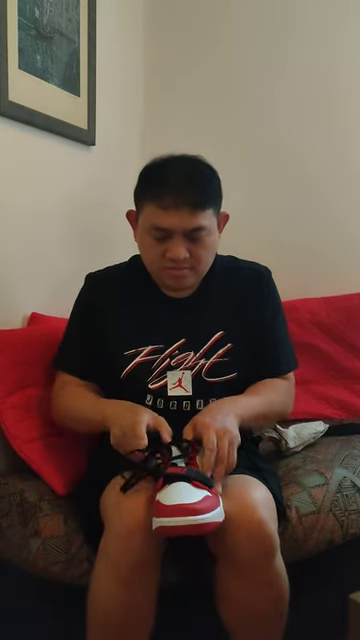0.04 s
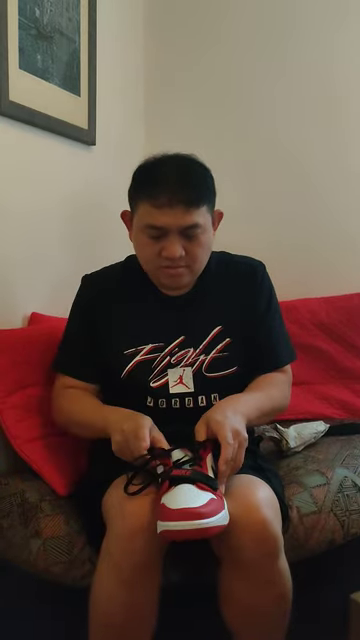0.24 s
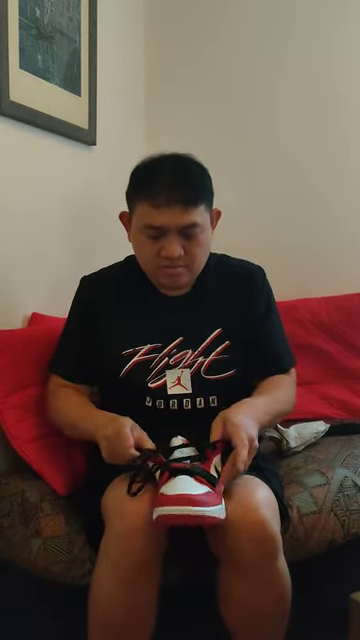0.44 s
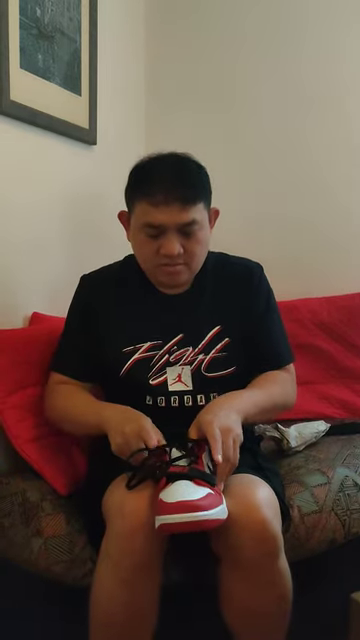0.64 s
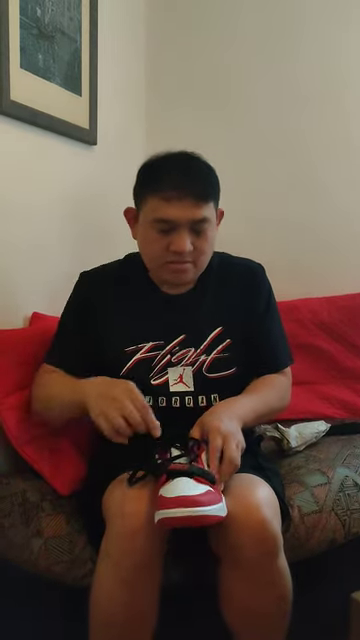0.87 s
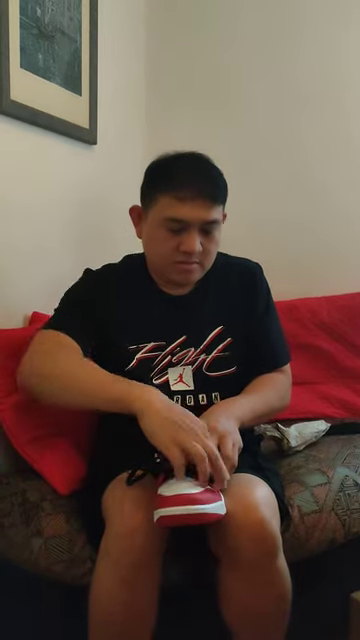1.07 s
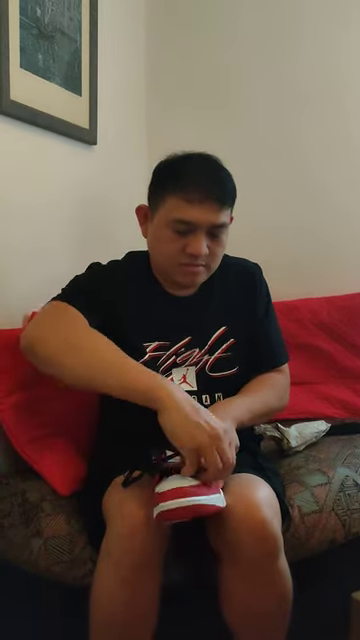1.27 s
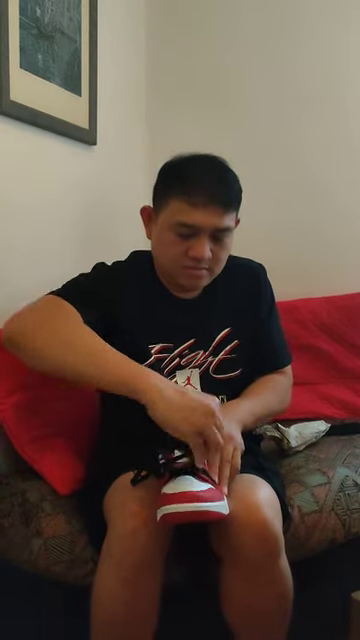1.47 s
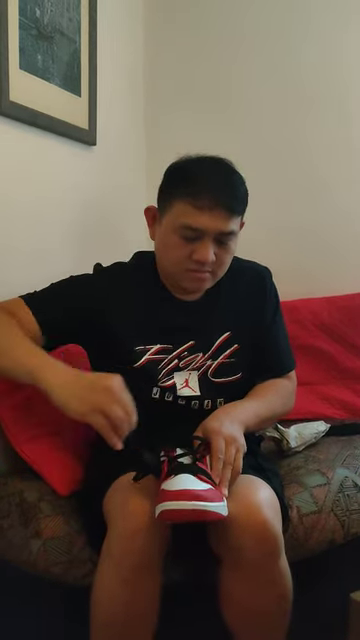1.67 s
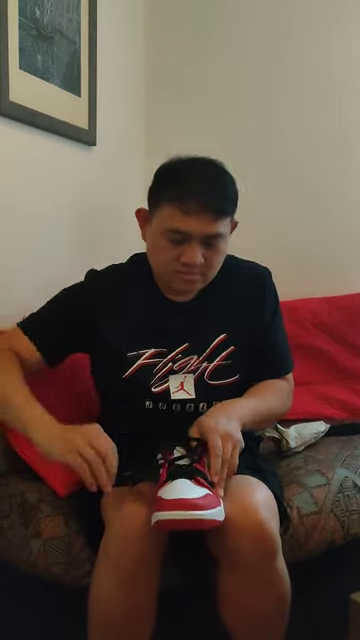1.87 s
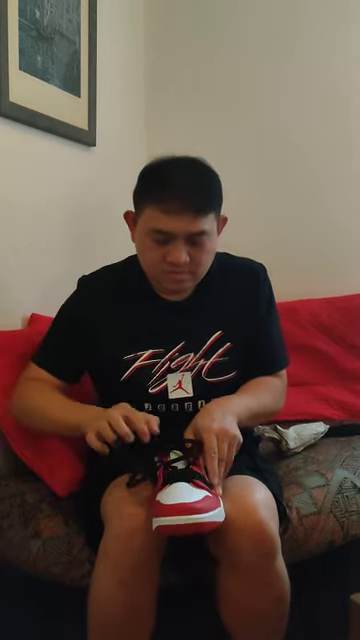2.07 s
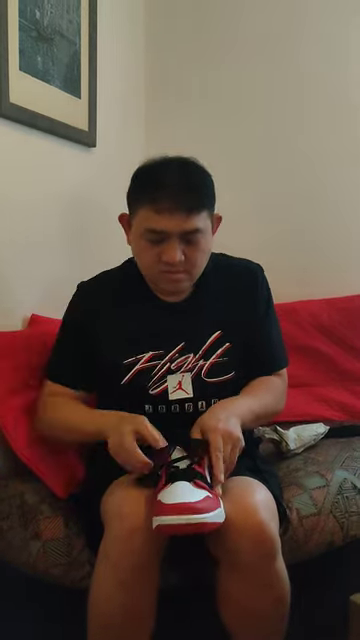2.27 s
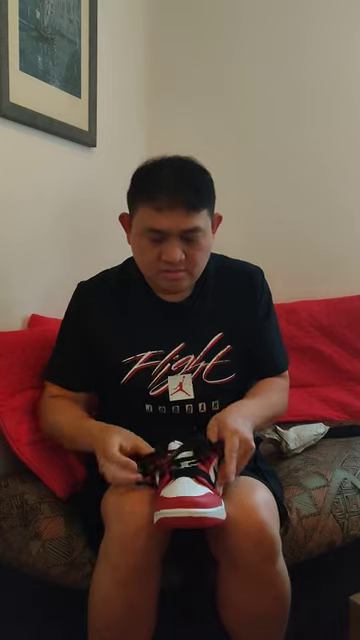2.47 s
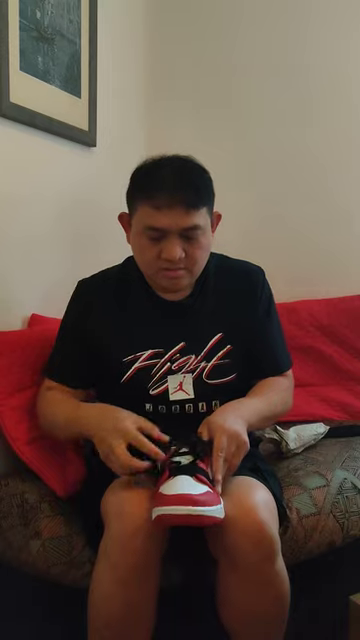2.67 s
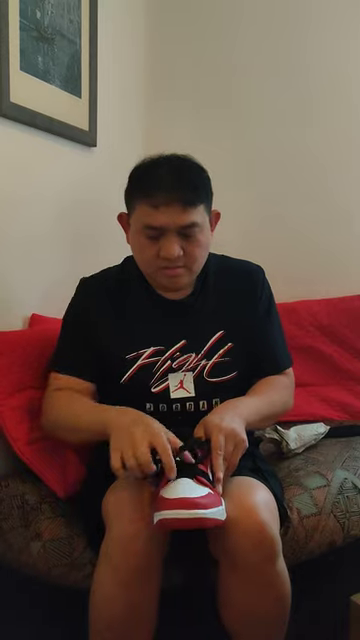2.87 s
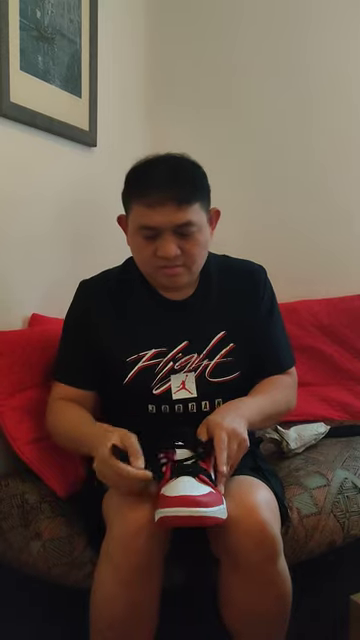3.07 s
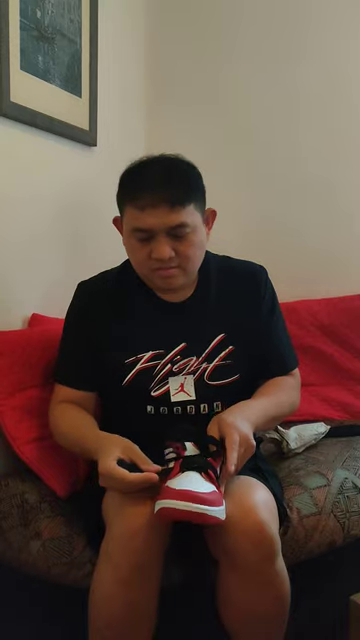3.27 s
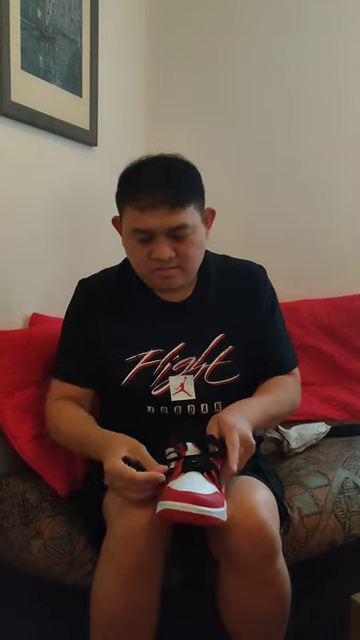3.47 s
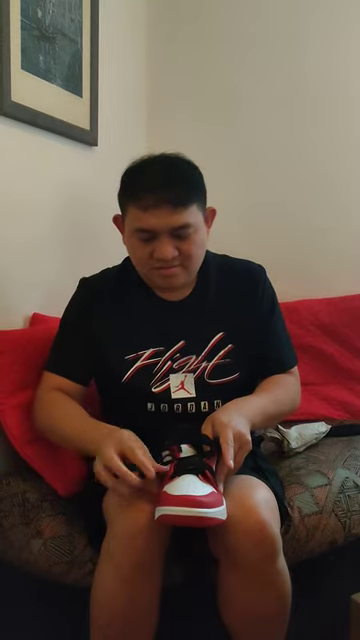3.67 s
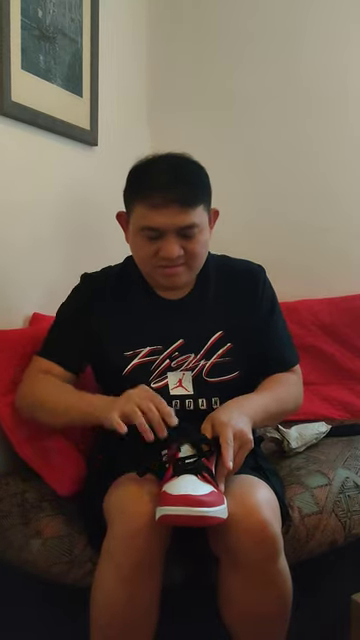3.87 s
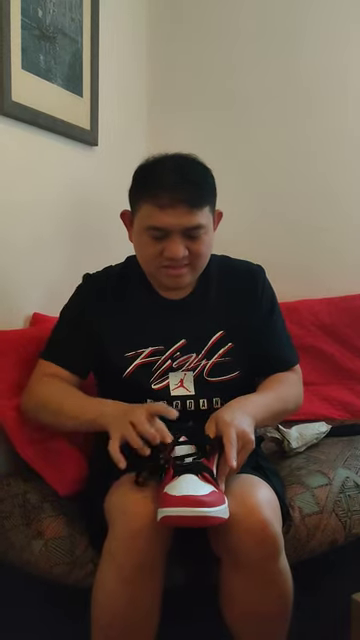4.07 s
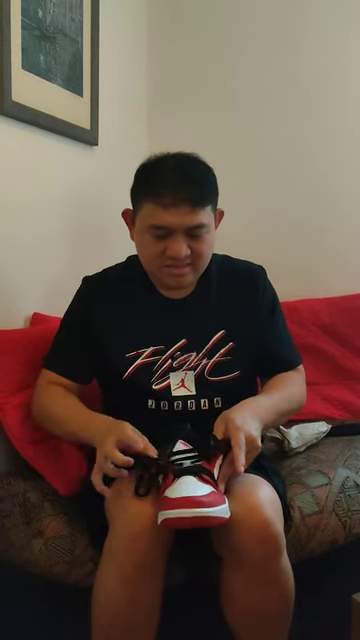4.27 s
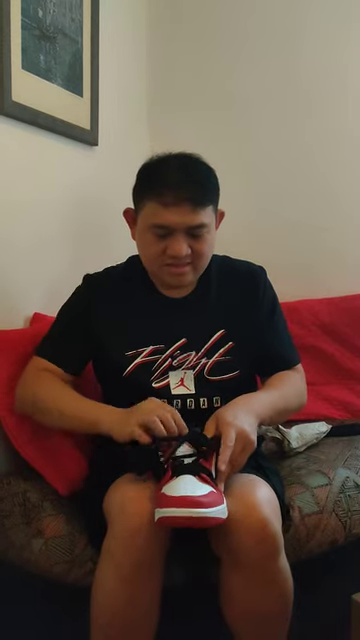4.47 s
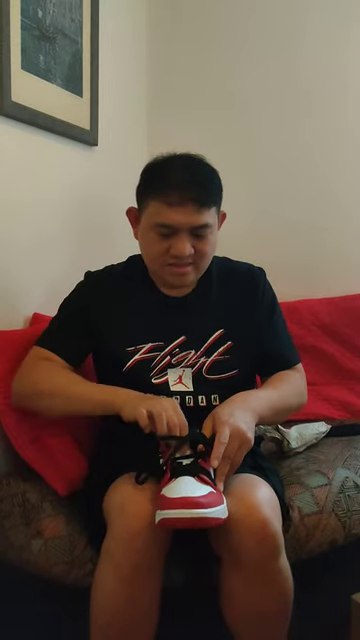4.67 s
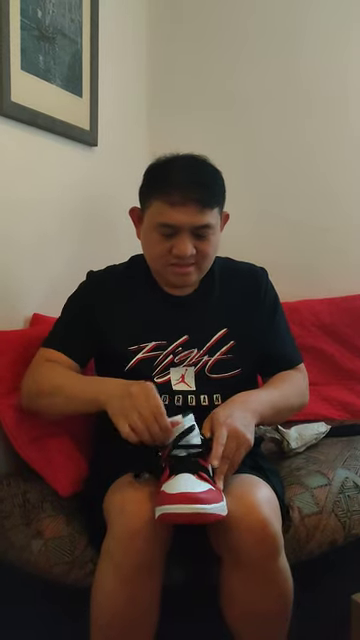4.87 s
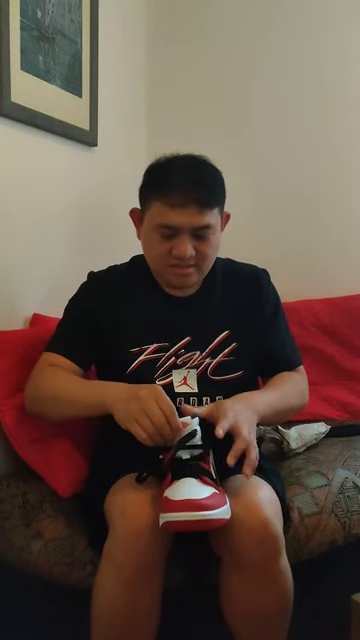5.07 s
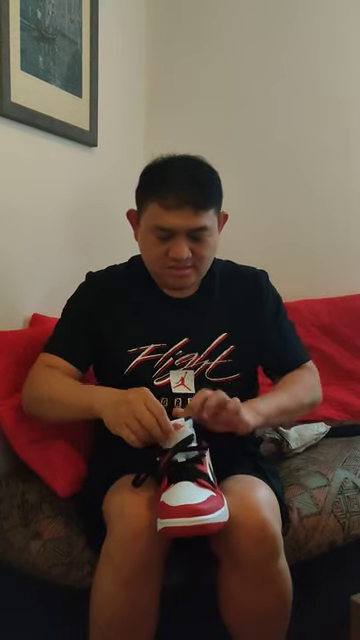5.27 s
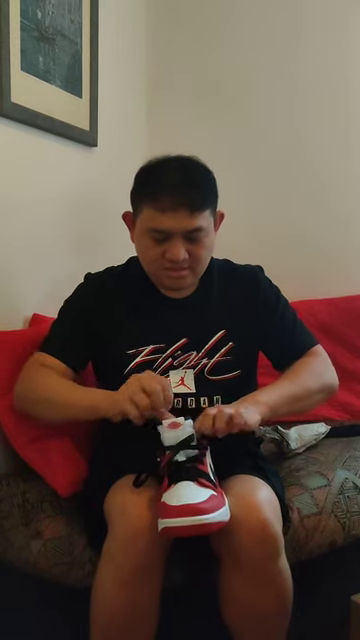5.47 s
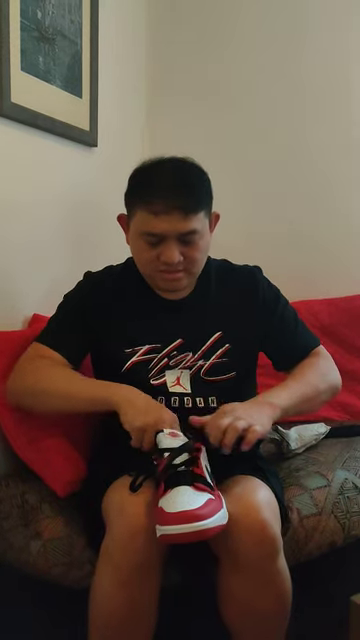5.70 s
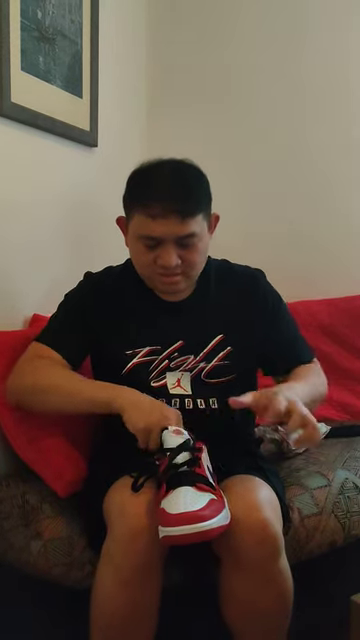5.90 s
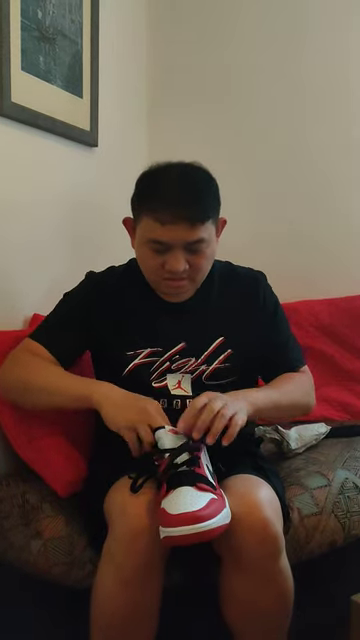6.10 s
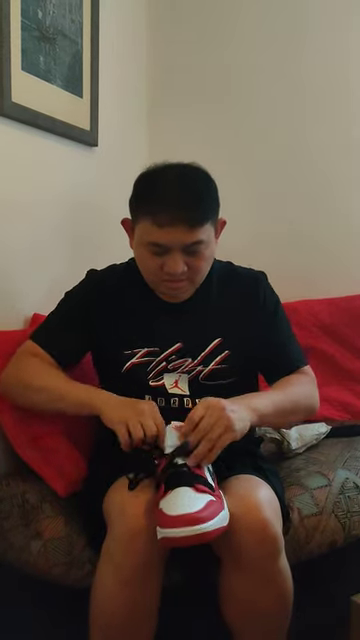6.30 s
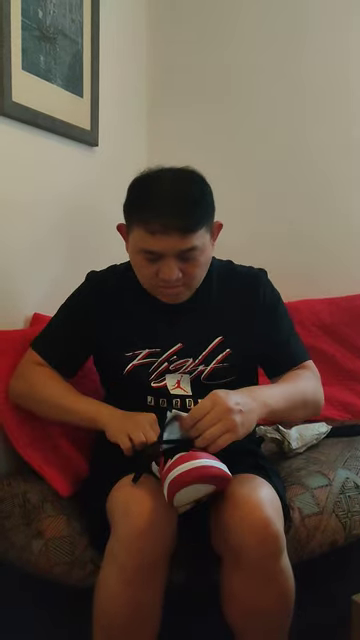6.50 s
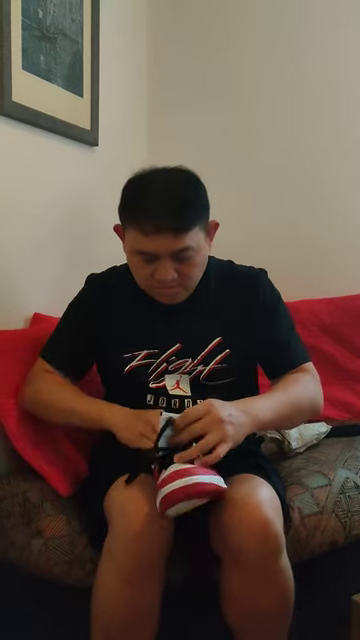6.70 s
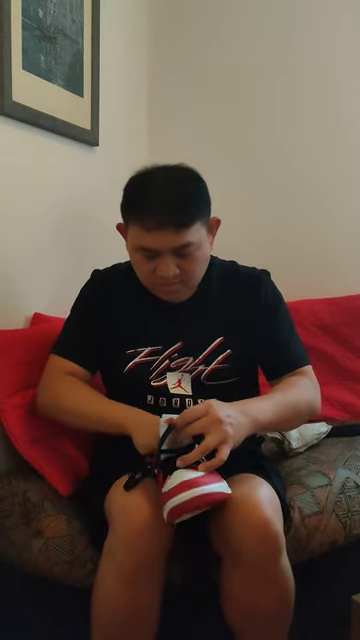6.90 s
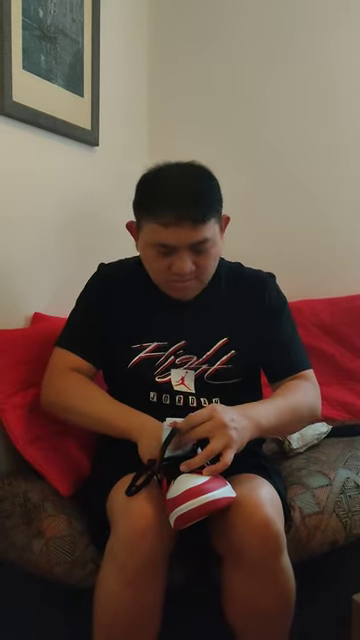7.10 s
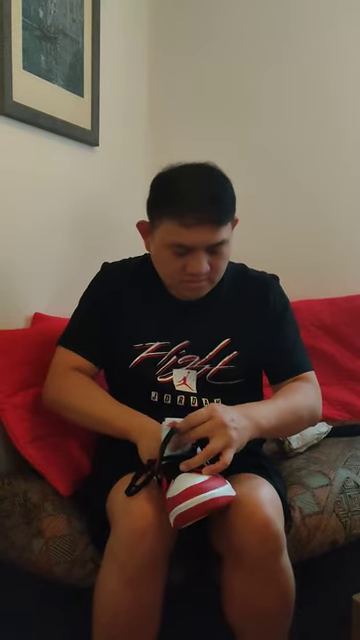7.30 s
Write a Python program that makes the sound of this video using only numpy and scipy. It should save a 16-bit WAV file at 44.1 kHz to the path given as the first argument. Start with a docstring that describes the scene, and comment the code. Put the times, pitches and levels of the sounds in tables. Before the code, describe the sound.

Soft lace rustling, one bright zipping swish, then small leather rubs, dry ticks and dull shoe bumps, ending with a brief scrape and thud.

```python
"""In a small, quiet room someone laces a leather sneaker on their lap.
The lace rustles and is pulled through an eyelet with a loud swish; fingers rub and tap the hollow shoe, which
thuds on the knees and scuffs as it is turned at the end. Rubbing is a dense train of random slips through a
colour; catches and ticks are decaying noise bursts; bumps, thuds and the scuff's ring are damped sines.
Decaying noise makes the brief answer of the walls, over faint air."""
import sys
import numpy as np
from scipy import signal
from scipy.fft import rfft, irfft, next_fast_len
from scipy.io import wavfile
from scipy.ndimage import uniform_filter1d, map_coordinates

SR = 44100
rng = np.random.default_rng(int(sys.argv[2]) if len(sys.argv) > 2 else 0)


def to_wav(sig):
    """Store sig (one row per channel, or 1-D mono) as 16-bit WAV at the path in sys.argv[1].

    Samples outside -1..1 are clipped; the rate is SR.
    """
    pcm = np.clip(np.atleast_2d(sig), -1, 1) * 32767
    pcm = np.round(pcm).astype(np.int16)
    wavfile.write(sys.argv[1], SR, pcm.T)  # frames by channels


N = 324085
TIME = np.arange(N) / SR
# Every spectrum below lists hz, relative density_db (per Hz); its overall level is normalised.
# Event levels are relative too: the layers that play them add their own trims and envelopes.


def amp(db):
    """The decibel law: level to linear gain."""
    return 10 ** (np.asarray(db) / 20)


def unit(x):
    """Power normalisation: scale to rms 1."""
    return x / np.sqrt(np.mean(x ** 2) + 1e-20)


def along(points, hz):
    """Logarithmic frequency scale: interpolate (hz, value) points along it."""
    point_hz, value = np.transpose(points)
    return np.interp(np.log(hz + 1), np.log(point_hz + 1), value)


def gains(rows):
    """Amplitude envelopes: one gain curve for each dB column, silent outside the rows' span."""
    s, *columns = np.transpose(rows)
    gate = np.interp(TIME, [s[0] - 0.02, s[0], s[-1], s[-1] + 0.02], [0, 1, 1, 0])
    return np.array([gate * amp(np.interp(TIME, s, column)) for column in columns])


def wobble(rate):
    """Slow random modulation: a smooth curve with rate knots a second."""
    knots = rng.standard_normal(int(N * rate / SR) + 4)
    return map_coordinates(knots, [TIME * rate])


def filtered(x, response):
    """Linear filtering: multiply the spectrum by a response of frequency."""
    size = next_fast_len(N + SR // 2)
    hz = np.fft.rfftfreq(size, 1 / SR)
    return irfft(rfft(x, size) * response(hz), size)[..., :N]


def coloured(x, spectrum):
    """Spectral shaping: a response that keeps the power of white noise."""
    return filtered(x, lambda hz: unit(amp(along(spectrum, hz))))


def add(track, s, sound):
    """Superposition: mix a sound into a track at time s."""
    start = max(round(s * SR), 0)
    track[start:start + len(sound)] += sound[:N - start]


def friction(spectrum, slips_per_s, spread_db, judder_db, judder_rate):
    """Stick-slip friction of rms 1: tiny slips of random size, modulated by an uneven grip."""
    slips = rng.random(N) < slips_per_s / SR
    spread = amp(spread_db * np.clip(rng.standard_normal(N), -2, 2))
    sizes = spread * rng.standard_normal(N)
    grip = amp(judder_db * np.clip(wobble(judder_rate), -2, 2))
    return unit(coloured(slips * sizes * grip, spectrum))


def patchy(x, patchy_db):
    """Time-varying filtering: the colour of a rub drifts as the contact moves; rms 1."""
    z = signal.stft(x, nperseg=512)[2]
    field = uniform_filter1d(rng.standard_normal(z.shape), 7, axis=0)  # smooth over frequency
    field = uniform_filter1d(field, 12, axis=1)  # and over time
    drifting = signal.istft(z * amp(patchy_db * unit(field)), nperseg=512)[1]
    return unit(drifting[:N])


def cracks(rows, spectrum, t60):
    """Sudden release: a coloured noise burst with exponential decay for each (start_s, level_db)."""
    track, t = np.zeros(N), np.arange(SR // 20) / SR
    for s, db in rows:
        add(track, s, amp(db - 60 * t / t60) * rng.standard_normal(len(t)))
    return coloured(track, spectrum)


# the long pull: time_s, lace_hiss_db, leather_drag_db
PULL_COURSE = [(1.28, -64, -74), (1.3, -49.5, -60), (1.335, -47.5, -58), (1.347, -33.5, -54.5),
               (1.375, -34.5, -51.5), (1.42, -40.5, -52), (1.449, -35, -46.5), (1.5, -37, -46.5),
               (1.544, -47.5, -48), (1.562, -31.5, -48), (1.602, -28, -47), (1.66, -56, -70.5)]
# spectrum of the braid sliding through the eyelet: hz, density_db
SLIDE_COLOUR = [(300, -61), (1760, -31), (3000, -22), (3700, -12), (4500, -1), (5900, -1.5), (7000, 4),
                (8050, -2), (8950, 5.5), (9800, -6), (11800, -8.5), (12600, -22), (14200, -22)]
# spectrum of the lace whipping out at the end of the pull: hz, density_db
WHIP_COLOUR = [(300, -65.5), (3000, -21.5), (4500, -18), (5600, -5), (6700, 2), (7900, 0.5), (9000, 4),
               (10000, -15), (11500, -7.5), (12800, -20), (14200, -26.5)]
# spectrum of the lace dragging on the leather: hz, density_db
DRAG_COLOUR = [(40, -51), (100, -15.5), (250, -4.5), (540, 3.5), (800, -6.5), (1500, -5), (1900, -7),
               (2300, 0), (2900, -4.5), (4600, 1.5), (6500, -5), (10000, -32.5)]
# spectrum of the hollow shoe shaken by rubbing, in the pull and in handling: hz, density_db
HOLLOW_COLOUR = [(35, -52), (90, -33), (190, -9), (270, -9), (345, 8), (410, -5.5), (560, -8), (800, -21),
                 (1500, -34), (5000, -58.5)]
WHIP_S, WHIP_TURN_S = 1.54, 0.03  # start and duration of the turn to the whip's hiss


def pull():
    """Stick-slip excitation: the braid rasps in the eyelet; its drag shakes leather and hollow."""
    hiss, drag = gains(PULL_COURSE)
    whip = np.clip((TIME - WHIP_S) / WHIP_TURN_S, 0, 1)
    slide = friction(SLIDE_COLOUR, slips_per_s=11000, spread_db=1.0, judder_db=6, judder_rate=300)
    flick = friction(WHIP_COLOUR, slips_per_s=12000, spread_db=1.5, judder_db=3.5, judder_rate=120)
    # equal-power crossfade from slide to flick
    rasp = hiss * (np.sqrt(1 - whip) * amp(-3) * slide + np.sqrt(whip) * amp(-2.5) * flick)
    rub = friction(DRAG_COLOUR, slips_per_s=7000, spread_db=3, judder_db=2.0, judder_rate=120)
    leather = amp(2.6) * drag * patchy(rub, patchy_db=1.9)
    shake = friction(HOLLOW_COLOUR, slips_per_s=1500, spread_db=5.0, judder_db=3.0, judder_rate=50)
    hollow = amp(-1) * drag * shake
    return rasp + leather + hollow


def during_pull(per_s):
    """Jittered periodicity: unevenly spaced moments of the pull, with hiss and drag (dB) at each."""
    s, hiss_db, drag_db = np.transpose(PULL_COURSE)
    turns = np.arange(100) + rng.uniform(-0.5, 0.5, 100)
    times = s[0] + turns / per_s
    times = times[times < s[-1]]
    return times, np.interp(times, s, hiss_db), np.interp(times, s, drag_db)


# the weave catches on an eyelet in the pull, then two lace ticks near 6.57 s: start_s, level_db
LACE_SNAPS = [(1.2526, -51), (1.2862, -38.5), (1.2939, -35), (1.2984, -34), (1.3124, -27), (1.325, -23.5),
              (1.343, -22), (1.3618, -18.5), (1.3948, -25), (1.4434, -23), (1.4571, -25), (1.5573, -19),
              (1.5707, -22), (1.5907, -17.5), (1.6074, -17.5), (6.5665, -45.5), (6.5874, -42)]
# spectrum of these snaps and ticks of the lace: hz, density_db
SNAP_COLOUR = [(300, -63.5), (1500, -31.5), (3200, -24.5), (5000, -8), (6900, 4.5), (7900, -6.5), (9000, 6),
               (11500, -7.5), (14000, -20.5)]
CATCHES_PER_S, CATCH_DB = 70, 7  # lesser catches all along the pull: rate, level over the hiss
# the pulled lace jerks the shoe: rate, level over the drag, relative level of the upper modes
TUGS_PER_S, TUG_DB, TUG_UPPER_DB = 23, 4.5, -2


def snags():
    """Sudden release: in the pull the weave snaps free and jerks bump the shoe; two late lace ticks."""
    catches = [(s, hiss_db + CATCH_DB) for s, hiss_db, _ in zip(*during_pull(CATCHES_PER_S))]
    tugs = [(s, drag_db + TUG_DB, TUG_UPPER_DB) for s, _, drag_db in zip(*during_pull(TUGS_PER_S))]
    snaps = cracks([*LACE_SNAPS, *catches], SNAP_COLOUR, t60=0.016)
    return amp(-7) * snaps + bumps(tugs)


STROKE_ATTACK_S, STROKE_RELEASE_S = 0.0287, 0.025


def stroke(start, length, db, swell_db=0):
    """Gesture envelope: the gain of one rub eases in, holds or changes in dB, and lets go."""
    gain, t = np.zeros(N), np.arange(round((length + STROKE_RELEASE_S) * SR)) / SR
    attack = np.clip(t / STROKE_ATTACK_S, 0, 1)
    release = np.clip((length - t) / STROKE_RELEASE_S + 0.5, 0, 1)
    gate = np.sin(np.pi / 2 * attack * release) ** 2
    add(gain, start, gate * amp(db + swell_db * (t / length - 0.5)))
    return gain


# strokes of lace and fingers over the shoe:
# start_s, length_s, lace_hiss_db, leather_rub_db (both at mid-stroke), swell_db (start to end)
RUB_STROKES = [(0.087, 0.097, -71, -78, -5), (0.187, 0.058, -73, -80, 6), (0.237, 0.13, -65.5, -67.5, 0),
               (0.345, 0.15, -71, -72, 0), (.585, 0.14, -72, -79, 3), (0.788, 0.051, -65.5, -67, 4.5),
               (1.894, 0.094, -77, -86, -6), (2.014, 0.14, -75.5, -84, -13), (2.228, .33, -76, -76, 1),
               (2.658, 0.086, -70.5, -72.5, 4), (2.95, 0.088, -74, -82, 1), (3.082, 0.35, -76.5, -82.5, 7),
               (3.672, 0.067, -71.5, -81, -3), (3.766, 0.037, -64, -66.5, -6), (3.807, .05, -75.5, -81, 0),
               (4.015, 0.16, -70.5, -75, 5), (4.159, 0.14, -71.5, -74.5, 10),
               (4.396, 0.12, -73.5, -80, 9.5), (4.52, 0.15, -76.5, -78, -10),
               (4.739, 0.0585, -65.5, -73.5, 5), (4.795, 0.096, -59, -61, 6.5),
               (4.883, 0.084, -62.5, -63, -7), (5.023, .11, -69.5, -69.5, 9.5),
               (5.207, 0.12, -69.5, -72, -9), (5.324, 0.11, -67.5, -71.5, -5),
               (5.451, 0.088, -69.5, -76, 12), (5.607, 0.089, -63, -65.5, 7), (5.705, 0.082, -66, -62, -4),
               (5.937, 0.18, -73, -79.5, 3.5), (6.189, 0.32, -64, -68, 16), (6.532, 0.069, -62.5, -69, -1),
               (6.89, 0.12, -73.5, -76, -3)]
# spectrum of the lace sliding: hz, density_db
LACE_COLOUR = [(300, -49), (1500, -25.5), (3200, -4), (4300, 0), (6800, 0), (8000, -2.5), (9100, 3.5),
               (10200, -6), (11600, -7.5), (13000, -19.5), (14000, -19.5)]
# spectrum of fingers on leather: hz, density_db
LEATHER_COLOUR = [(80, -36), (300, -6), (700, 1), (1300, -0.5), (1800, 1.5), (2300, 4.5), (3200, -8.5),
                  (5000, -8), (9000, -20), (14000, -44)]
# the hollow's answer: its relative level when the rub is at FIRM_DB, and its dB per dB of rubbing
FIRM_DB, SHAKE_DB, SHAKE_GROWS = -70, -72, 0.65
# hands that never rest: relative dull level, relative hiss level, swing (dB), knots per s
GRIP_DB, GRIP_HISS_DB, GRIP_SWING_DB, GRIP_RATE = -80, -89, 2, 14


def handling():
    """Sliding friction: lace hisses and fingers rub leather, which shakes the hollow shoe."""
    fidget = amp(GRIP_SWING_DB * np.clip(wobble(GRIP_RATE), -2, 2))
    slide = sum(stroke(s, length, db, swell) for s, length, db, _, swell in RUB_STROKES)
    rub = sum(stroke(s, length, db, swell) for s, length, _, db, swell in RUB_STROKES)
    # independent strokes and fidgeting add in power
    hiss = np.hypot(slide, amp(GRIP_HISS_DB) * fidget)
    answer = amp(SHAKE_DB) * (rub / amp(FIRM_DB)) ** SHAKE_GROWS
    shake = np.hypot(answer, amp(GRIP_DB) * fidget)
    rustle = friction(LACE_COLOUR, slips_per_s=8000, spread_db=0.4, judder_db=2.5, judder_rate=100)
    lace = amp(-1.5) * hiss * patchy(rustle, patchy_db=1)
    skin = friction(LEATHER_COLOUR, slips_per_s=2800, spread_db=-0.5, judder_db=0.0, judder_rate=98)
    leather = amp(-2) * rub * patchy(skin, patchy_db=1.2)
    dull = friction(HOLLOW_COLOUR, slips_per_s=1200, spread_db=1.5, judder_db=1.0, judder_rate=28)
    hollow = amp(1) * shake * dull
    return lace + leather + hollow


# the shoe slips in the grip: start_s, length_s, level_db
GRIP_SLIPS = [(0.273, .15, -65), (1.166, 0.08, -63), (1.897, 0.064, -69), (2.119, .085, -63.5),
              (2.476, 0.11, -67), (3.338, 0.2, -70), (3.658, 0.19, -71), (4.144, 0.19, -68.5),
              (5.073, 0.058, -65), (5.483, 0.046, -60), (6.557, 0.094, -56.5)]
# spectrum of the shoe slipping in the grip: hz, density_db
SLIP_COLOUR = [(60, -41), (190, -14.5), (280, -2.5), (345, 4), (430, 1.5), (520, -3), (640, -1.5),
               (800, -14), (1500, -28.5), (5000, -53.5)]


def grip_slips():
    """Friction on a hollow body: the shoe slips in the grip with a dull rub."""
    rub = friction(SLIP_COLOUR, slips_per_s=600, spread_db=1.5, judder_db=3.5, judder_rate=41)
    return amp(-2) * sum(stroke(*row) for row in GRIP_SLIPS) * rub


# small dry ticks of lace tip and leather: start_s, level_db
DRY_TICKS = [(0.4713, -58), (1.117, -49), (2.1166, -61), (2.5556, -55), (2.6269, -55), (2.9687, -50.5),
             (3.4526, -56.5), (3.676, -55.5), (3.7795, -47.5), (4.8648, -41.5), (4.9544, -43),
             (5.2238, -48), (5.8341, -43), (6.707, -51), (6.852, -54.5), (6.8974, -47)]
# spectrum of a tick: hz, density_db
TICK_COLOUR = [(150, -34.5), (600, -1.5), (1000, 7), (1600, 1.5), (2450, 0.5), (3400, -8), (5500, -12.5),
               (9000, -12), (14000, -31.5)]


def ticks():
    """Impulsive contact: lace tip and leather tick in short, quickly damped bursts."""
    return amp(-9.5) * cracks(DRY_TICKS, TICK_COLOUR, t60=0.017)


# modes of the hollow shoe: nominal pitch_hz, relative level_db, t60_s
SHOE_MODES = [(342, 2, .13), (437.7, -6, 0.15), (487, -6, 0.035), (553, -7, 0.076), (620, -10, .05),
              (870, -17.5, 0.047), (1290, -21, 0.059)]


def bumps(rows):
    """Modal vibration: each bump rings the damped shoe, with its own balance of upper modes."""
    track, t = np.zeros(N), np.arange(SR // 4) / SR
    hz, level, t60 = np.transpose(SHOE_MODES)[:, :, None]
    sign = (-1) ** np.arange(len(hz))[:, None]  # neighbouring modes swing opposite ways
    for s, db, upper_db in rows:
        strength = level + rng.normal(0, 1.3, hz.shape)
        strength = strength + (hz > hz[0]) * (upper_db + 5.5)
        pitch = hz * (1 + rng.normal(0, 0.008, hz.shape))
        modes = sign * amp(strength - 60 * t / t60) * np.sin(2 * np.pi * pitch * t)
        ring = np.sum(modes, axis=0)
        add(track, s, amp(db - 3.5) * ring / np.abs(ring).max())
    return track


# fingers, and the snagging lace during the pull, bump the shoe:
# start_s, level_db, relative upper_modes_db
SHOE_BUMPS = [(0.279, -48, -13), (0.334, -57, 0), (0.495, -49.5, 3), (1.117, -60, -12), (1.322, -43, -4),
              (1.344, -41, 3), (1.362, -38.5, -10), (1.396, -38, -4), (2.117, -55, 13), (2.968, -47.5, -6),
              (3.121, -48, -9.5), (3.452, -52, -17), (3.675, -52, -4), (3.786, -46.5, -15),
              (4.511, -55, -17), (5.224, -54.5, -2), (5.834, -39.5, -2), (6.233, -56, -19),
              (6.568, -49, -5), (6.914, -56.5, -10)]


def taps_and_jolts():
    """Impact excitation: fingers, and the snagging lace in the pull, ring the modes of the shoe."""
    return bumps(SHOE_BUMPS)


# spectrum of the scuff: hz, density_db
SCUFF_COLOUR = [(40, -34), (120, -12), (210, -8.5), (315, 0.5), (390, -5), (520, -11.5), (605, -4),
                (700, -9), (1020, -18), (1200, -11), (2000, -11), (2800, -12), (3500, -20), (4350, -8.5),
                (5000, -19.5), (9200, -25.5), (12000, -43), (14000, -45)]
# the thin ring that the scuff sets off: pitch_hz, level_db, t60_s
SCUFF_RING = [(4140, -61, 0.15), (4462, -57, 0.33)]
SCUFF_S, SCUFF_DB = 7.176, -46  # start, level
SCUFF_ATTACK_S, SCUFF_HOLD_S, SCUFF_FALL_DB_PER_S = 0.021, 0.04, 213  # hold counts from the start
RING_DELAY_S = 0.0063


def scuff():
    """Friction and resonance: a short, dense scrape of the turned shoe leaves a thin ring."""
    age = TIME - SCUFF_S
    attack = np.clip(age / SCUFF_ATTACK_S, 0, 1)
    fall_db = SCUFF_FALL_DB_PER_S * np.maximum(age - SCUFF_HOLD_S, 0)
    scrape = friction(SCUFF_COLOUR, slips_per_s=14000, spread_db=1.5, judder_db=0.2, judder_rate=150)
    track = attack * amp(SCUFF_DB - fall_db) * scrape
    t = np.arange(SR // 4) / SR
    for hz, db, t60 in SCUFF_RING:
        envelope = amp(db - 60 * t / t60) * (1 - np.exp(-t / 0.0027))
        add(track, SCUFF_S + RING_DELAY_S, envelope * np.sin(2 * np.pi * hz * t))
    return track


# the shoe shifts on the knees: start_s, level_db, pitch_hz
KNEE_THUDS = [(3.776, -72, 81), (4.82, -66, 85), (5.27, -62.5, 114), (5.359, -64.5, 110),
              (5.732, -59.5, 98), (6.234, -68, 60), (7.18, -52.5, 70), (7.229, -50.5, 70)]


def thuds():
    """Damped oscillation: soft contacts with the knees swing slowly and die away."""
    track, t = np.zeros(N), np.arange(SR // 4) / SR
    for s, db, hz in KNEE_THUDS:
        envelope = amp(db - 60 * t / 0.25) * (1 - np.exp(-t / 0.0014))
        add(track, s, envelope * np.sin(2 * np.pi * hz * t))
    return track


# decay of the walls' answer: hz, t60_s
WALL_DECAY = [(100, 0.49), (350, 0.41), (1000, 0.52), (3000, 0.39), (7000, 0.36), (13000, 0.26)]


def room(x):
    """Diffuse reverberation at two microphones: decaying noise whose highest treble dies first."""
    hz, t, z = signal.stft(rng.standard_normal((2, SR // 2)), SR, nperseg=256)
    decay = amp(-60 * t / along(WALL_DECAY, hz)[:, None])
    tail = signal.istft(z * decay, SR, nperseg=256)[1]
    tail = tail / np.linalg.norm(tail[0])
    tail = np.pad(tail, ((0, 0), (SR // 300, 0)))  # the answer starts 1/300 s late
    return signal.fftconvolve(x[None], tail, axes=1)[:, :N]


# spectrum of the still air: hz, density_db
AIR_COLOUR = [(20, 4.5), (45, -6.5), (70, -2.5), (110, -9.5), (160, -15.5), (210, -9.5), (335, -14.5),
              (450, -18), (830, -22), (2300, -25), (4000, -29), (9000, -29.5), (14000, -43.5)]


def air():
    """Stationary random noise: the still air of the room, independent in each channel."""
    return amp(-65.5) * unit(coloured(rng.standard_normal((2, N)), AIR_COLOUR))


def scene():
    """Superposition: the shoe straight ahead, its reverberation, dry thuds and the air."""
    shoe = pull() + snags() + handling() + grip_slips() + ticks() + taps_and_jolts() + scuff()
    return shoe + thuds() + amp(-1.0) * room(shoe) + air()


# stereo width of the pickup: hz, side_gain_db
SIDE_GAIN = [(100, -52.5), (3600, -57), (4500, -25), (6500, -5), (9000, -4.5), (13000, -2)]
TOP_HZ = 14260  # upper band limit


def record(dry):
    """Mid-side pickup with a band limit: nearly mono below the treble, wider above."""
    mid = (dry[0] + dry[1]) / 2
    side = filtered((dry[0] - dry[1]) / 2, lambda hz: amp(along(SIDE_GAIN, hz)))
    stereo = np.array([mid + side, mid - side])
    return filtered(stereo, lambda hz: hz < TOP_HZ)


dry = scene()
out = record(dry)
to_wav(out)
```